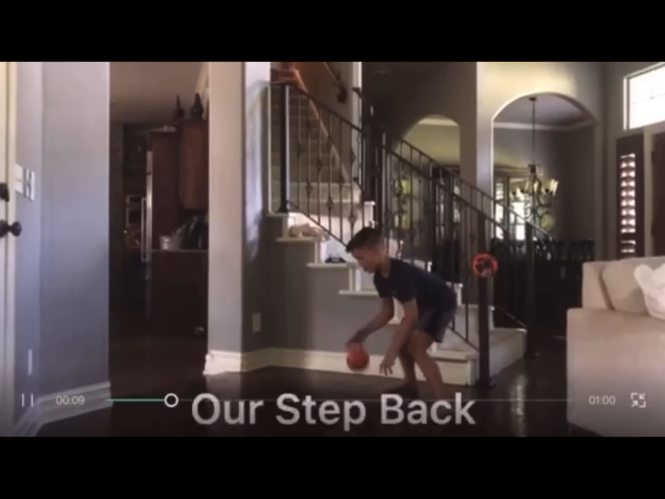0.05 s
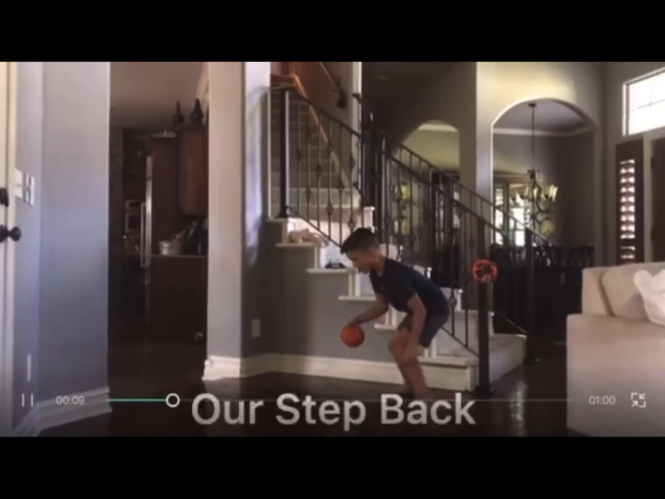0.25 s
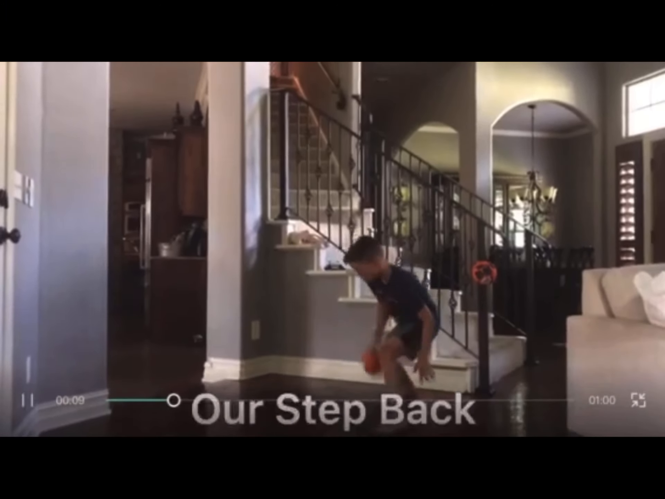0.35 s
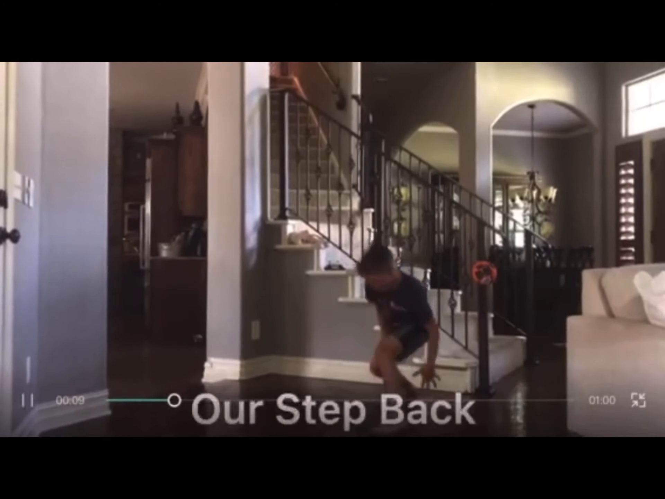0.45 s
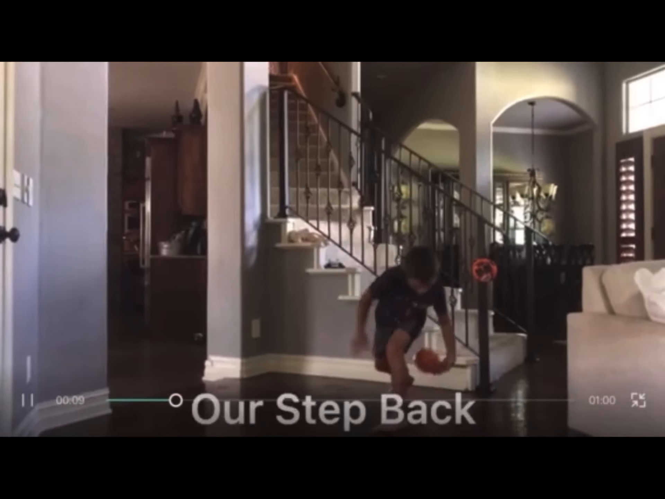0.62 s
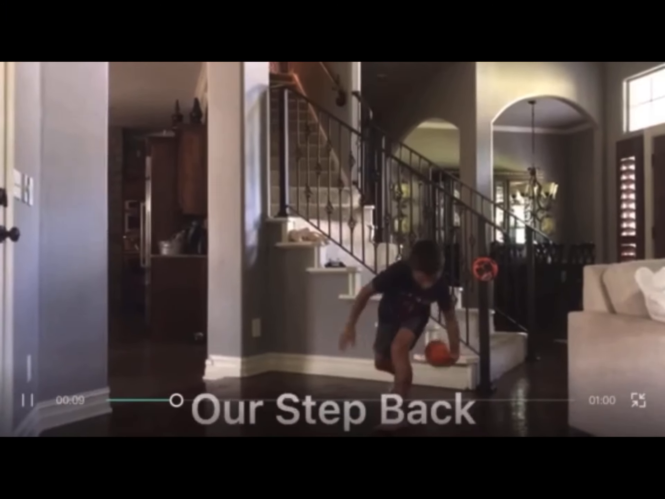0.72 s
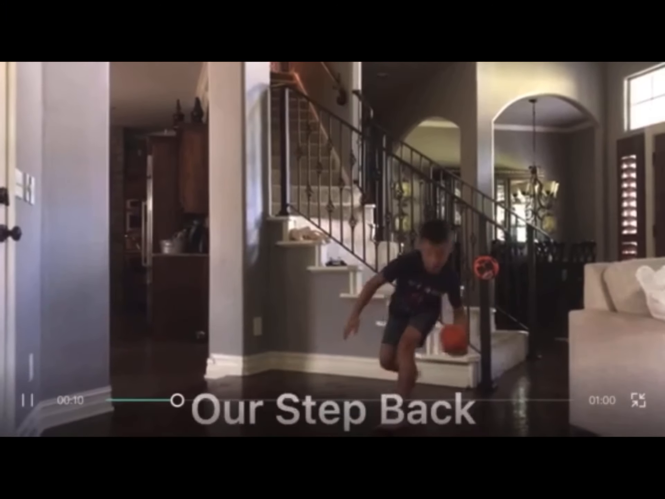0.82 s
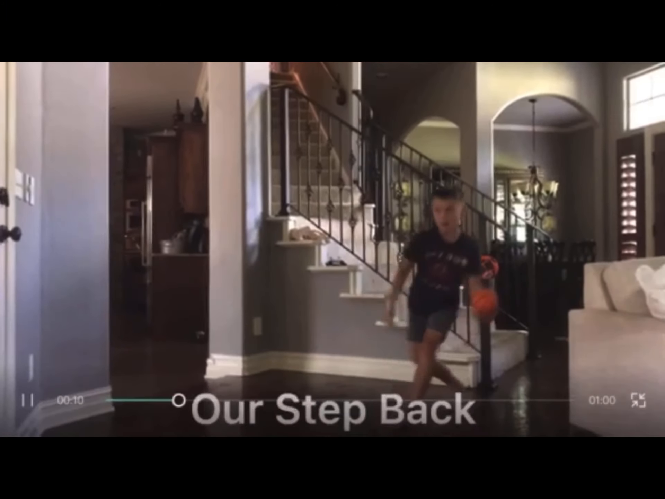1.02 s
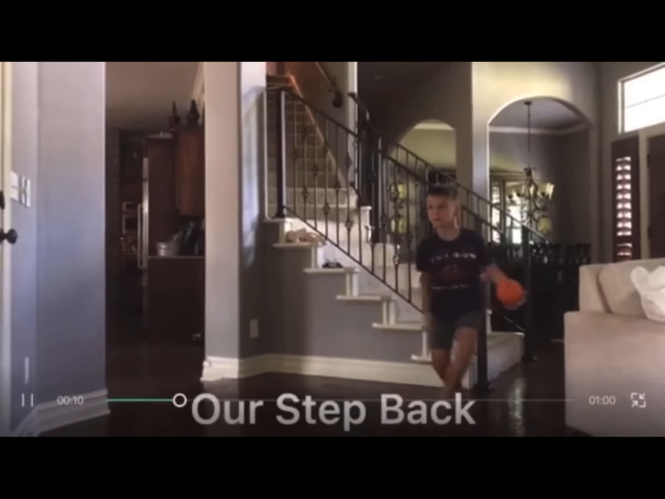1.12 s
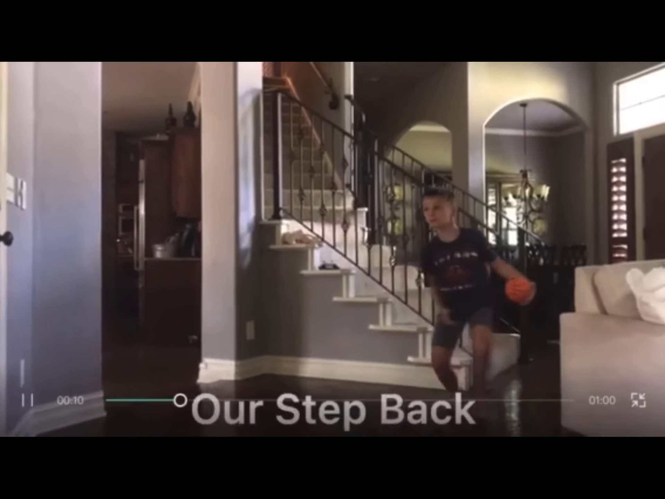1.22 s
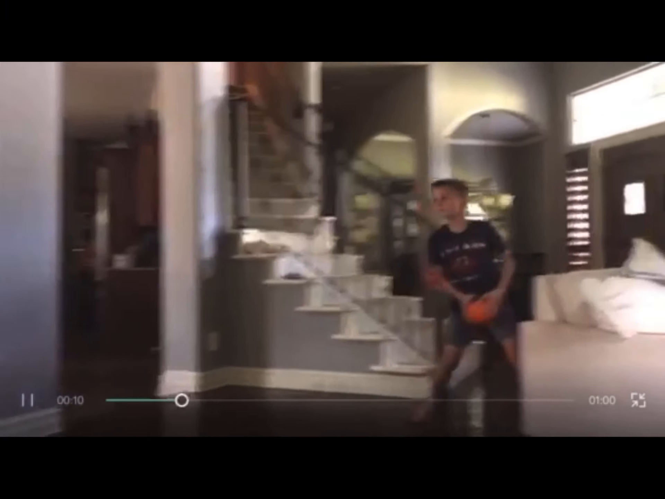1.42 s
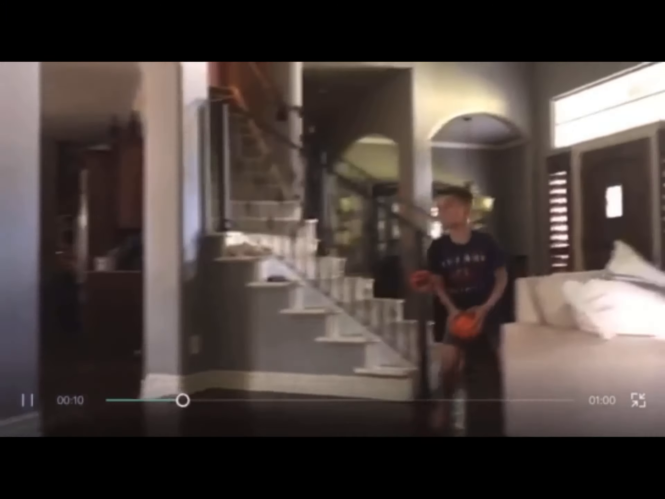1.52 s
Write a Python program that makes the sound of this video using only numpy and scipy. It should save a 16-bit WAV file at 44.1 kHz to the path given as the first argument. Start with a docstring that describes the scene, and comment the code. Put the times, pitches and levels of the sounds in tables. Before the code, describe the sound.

A small rubber ball bounces three times on a hard floor, echoing among shuffling feet.

```python
"""Over the low rumble of a house, a small rubber ball smacks the hard floor of a tall entryway.
The smack's echo swells, holds level for a moment, then dies away.
Feet land and shuffle around a second bounce, and just before one second comes the third and hardest.
As its echo fades, a foot brushes the floor once more."""
import sys
import numpy as np
from scipy import signal
from scipy.fft import rfft, irfft
from scipy.io import wavfile
from scipy.ndimage import uniform_filter1d, minimum_filter1d

SR = 44100
rng = np.random.default_rng(int(sys.argv[2]) if len(sys.argv) > 2 else 0)


def dump(signal):
    """Clip the signal to [-1, 1] and save it as 16-bit WAV at the path in sys.argv[1]."""
    limited = np.clip(np.atleast_2d(signal).T, -1, 1)
    pcm = np.round(limited * 32767).astype(np.int16)
    wavfile.write(sys.argv[1], SR, pcm)


N = 68355
T = np.arange(N) / SR
HZ = np.fft.rfftfreq(2 * N, 1 / SR)

# the ball hitting the floor: t/s, level/dB, hardness/0-1, swell time/s, swell/dB, hold until/s, ring/dB
BOUNCES = [(0.2192, -18.5, 0.0, 0.067, 6.5, .26, 0.5), (0.5955, -17.5, 0.15, 0.058, 7.5, 0.2, -0.5),
           (0.958, -12.5, 1.0, 0.053, 7, .208, -6)]


def amp(db):
    """Turns decibels into a number to multiply by."""
    return 10 ** (np.asarray(db) / 20)


def unit(x):
    """Scales a signal to an average power of one."""
    return x / np.sqrt(np.mean(x ** 2) + 1e-20)


def curve(points):
    """Joins (frequency, value) points into a curve over all frequencies."""
    f, value = np.transpose(points)
    return np.interp(np.log(HZ + 1), np.log(f + 1), value)


def add(mix, s, sound):
    """Mixes a sound in, starting at s seconds."""
    part = mix[max(round(s * SR), 0):][:len(sound)]
    part += sound[:len(part)]


def colour(x, db):
    """Shapes the tone with a curve in dB; white noise would keep its power."""
    cepstrum = irfft(np.log(unit(amp(db)) + 1e-6))
    # folded so that the filter rings only after a hit, never before
    cepstrum[1:N] *= 2
    cepstrum[N + 1:] = 0
    return irfft(rfft(x, 2 * N) * np.exp(rfft(cepstrum)))[:N]


def tone(hz):
    """A pure tone that starts anywhere in its cycle."""
    return np.sin(2 * np.pi * (hz * T + rng.random()))


def reflections(gap=4):
    """Densely packed echoes: one click, randomly up or down, in every few samples."""
    out = np.zeros(N)
    at = np.arange(0, N - gap, gap)
    out[at + rng.integers(0, gap, len(at))] = rng.choice([-1., 1.], len(at))
    return unit(out)


def hold_then_fade(hold_s, bend_s=0.018):
    """Seconds spent before and in the fade since a bounce, with a soft turn between."""
    fading = bend_s * np.logaddexp(0, (T - hold_s) / bend_s)
    return T - fading, fading


def steady_noise(points):
    """Even noise with the given tone colour."""
    return unit(irfft(rfft(rng.standard_normal(2 * N)) * amp(curve(points)))[:N])


def house():
    """The house rumbles steadily, with a low hum and a faint hiss."""
    # tone colours of the rumble and the hiss: f/Hz, relative level/dB
    rumble_colour = [(15, -30), (27, -8), (35, -9), (47, -1.5), (72, -1), (100, -16), (118, -9), (140, -26),
                     (175, -15.5), (215, -27), (400, -35), (800, -62)]
    hiss_colour = [(100, -30), (400, 3.5), (1600, 2.5), (3000, -4.5), (5000, -10), (10000, -16.5),
                   (12000, -22), (15500, -15)]
    # tones of the hum: f/Hz, level/dB
    hum_tones = [(47.3, -40.5), (71, -48.5), (118, -56.5)]
    rumble = amp(-41.5) * steady_noise(rumble_colour)
    hiss = amp(-57) * steady_noise(hiss_colour)
    hum = sum(amp(db) * unit(tone(hz)) for hz, db in hum_tones)
    return rumble + hiss + hum


def shuffles():
    """Soles brush across the floor, each making a swish of noise."""
    # foot slides: peak t/s, rise/s, fall/s, level/dB
    slides = [(0.377, 0.049, .02, -39), (0.48, 0.077, 0.039, -42), (0.715, .015, 0.016, -37.5),
              (0.84, 0.12, 0.076, -43.5), (1.56, 0.041, 0.049, -49.5)]
    # tone colour of a sliding sole: f/Hz, relative level/dB
    slide_colour = [(200, -12), (900, 1), (2000, 7), (4000, 5), (6500, 2), (9000, -3.5), (11500, -24),
                    (12800, -34), (15500, -24)]
    level = np.zeros(N)
    for s, rise, fall, db in slides:
        width = np.where(T < s, rise, fall)
        level += amp(db) * np.exp(-((T - s) / width) ** 2 / 2)
    return colour(level * rng.standard_normal(N), curve(slide_colour))


def feet(pat_s=.005, room_db=-7, room_fade_s=0.98, thud_hz=203.3, thud_fade_s=0.97):
    """Soles pat the floor, heels thud, and both echo softly."""
    # footfalls: t/s, pat level/dB, thud level/dB
    steps = [(0.255, -48, -33.5), (0.467, -32.5, -46), (0.58, -31.5, -46.5), (0.587, -30, -40),
             (0.634, -53, -34.5), (0.86, -38, -39.5), (0.931, -29.5, -65)]
    # tone colour of a landing sole: f/Hz, relative level/dB
    sole_colour = [(100, -9), (560, -0.5), (1200, -1), (2500, -2.5), (4500, -15.5), (8000, -24.5),
                   (11000, -40), (12500, -58)]
    heel_colour = np.maximum(-14 * np.log2((HZ + 1) / thud_hz) ** 2, -80)
    pat_shape = np.exp(-T / pat_s) + amp(room_db - 60 * T / room_fade_s)
    pats, thuds = np.zeros((2, N))
    for s, pat_db, thud_db in steps:
        add(pats, s, amp(pat_db) * reflections() * pat_shape)
        add(thuds, s, reflections() * amp(thud_db - 60 * T / thud_fade_s))
    return colour(pats, curve(sole_colour)) + colour(thuds, heel_colour)


def wall_echoes(burst_s=.004):
    """Flat walls send back short, sharp copies of the latest smack."""
    # returns from single walls: t/s, level/dB
    returns = [(0.2265, -19.5), (0.2715, -18), (0.2976, -16), (0.3035, -18), (0.5973, -25), (0.6172, -23),
               (0.6417, -19), (0.669, -18.5), (0.963, -16), (1.0025, -7), (1.0184, -10.5), (1.025, -11.5),
               (1.0635, -9.5), (1.0985, -22), (1.1358, -15), (1.174, -21), (1.222, -30)]
    bursts = np.zeros((len(BOUNCES), N))
    for s, db in returns:
        latest = sum(bounce[0] < s for bounce in BOUNCES) - 1
        add(bursts[latest], s, amp(db) * reflections() * np.exp(-T / burst_s))
    return sum(colour(x, smack_colour(hardness=bounce[2])) for x, bounce in zip(bursts, BOUNCES))


def smack_echo(swell_s, swell_db, hold_s):
    """The smack's echo swells, holds for a moment and dies away, each band at its own speed."""
    # loudness over time, by band: f/Hz, swell factor, slow drop/(dB/s), time to fade by 60 dB/s, rise/s
    bands = [(147, 0.34, 6, 1.36, 0.02), (536, 0.88, 12, 0.82, 0.0066), (1150, 0.88, 34.5, 0.53, 0.0009),
             (2200, 1.26, 50.5, 0.47, 0.00065), (4360, 0.81, 10.5, 0.35, 0.0043),
             (9000, 0.55, 22, 0.26, .005)]
    spectrum, out = rfft(reflections(), 2 * N), np.zeros(N)
    swell_left = 1 - np.minimum(T / swell_s, 1) ** 2
    accent_db = 2 * np.exp(-(T / 0.02) ** 2)  # the start stands out
    accent_db -= 0.5 * np.exp(-((T / swell_s - 0.3) / 0.17) ** 2)  # the level dips briefly
    accent_db += 0.5 * np.exp(-((T - swell_s) / 0.0083) ** 2)  # top of the swell
    held, fading = hold_then_fade(hold_s)
    past_top = np.maximum(held - swell_s, 0)
    centres = [band[0] for band in bands]
    for weights, (_, factor, drop, fade_s, rise_s) in zip(np.eye(len(bands)), bands):
        band = irfft(spectrum * curve(list(zip(centres, weights))))[:N]
        db = accent_db - factor * swell_db * swell_left - drop * past_top - 60 * fading / fade_s
        out += band * amp(db) * np.minimum(T / rise_s, 1)
    return out


def ringing(swell_s, hold_s, ring_db, fade_s=.55):
    """A few tones swell and linger after a bounce."""
    # lingering tones: f/Hz, relative level/dB, slow drop before the fade/(dB/s)
    tones = [(613.7, -17.5, 6.5), (1002, -18.5, 33), (1152, -15, 25), (1292, -10.5, 33), (1372, -16.5, 31),
             (1484, -17.5, 31), (1598, -13.5, 22), (1794, -10.5, 27), (1820, -14, 8), (2070, -14, 42),
             (2266, -15.5, 26)]
    held, fading = hold_then_fade(hold_s)
    ring = sum(amp(db - drop * held) * tone(hz) for hz, db, drop in tones)
    swell = np.minimum(T / swell_s, 1) ** 2
    return ring * swell * amp(ring_db - 60 * fading / fade_s)


def smack_colour(hardness):
    """Tone curve of a bounce in dB: brighter when harder, with narrow peaks in the midrange."""
    # tone colours of a light and a hard bounce: f/Hz, relative level/dB
    light = [(60, -25), (130, -12.5), (250, -9.5), (370, -13.5), (460, -10), (580, -2), (740, -7.5),
             (1050, -4), (1400, -3.5), (1850, 1), (2700, -7), (3400, -9.5), (4100, -15.5), (4900, -22),
             (6400, -21), (7800, -35.5), (9400, -39), (11500, -61), (13000, -63)]
    hard = [(60, -22), (150, -35), (400, -22.5), (580, -11), (760, -9), (1080, -4.5), (1350, -0.5),
            (1650, 3), (1950, 1), (2330, -7.5), (2700, -7), (2950, -9.5), (3300, -5), (4100, -12.5),
            (4900, -17), (5500, -13.5), (6700, -16), (7700, -24), (9400, -27.5), (11500, -44), (13000, -54)]
    # closely spaced midrange peaks that colour each smack: f/Hz, width/Hz, lift/dB
    peaks = [(994, 37, 5.5), (1166, 39, 7), (1582, 64, 5.5), (1678, 22, 5.5), (1826, 50, 5.5),
             (1898, 71, 6), (2083, 61, 7.5), (2199, 47, 8.5), (2333, 26, 7.5), (2445, 56, 10),
             (2585, 35, 8), (2713, 170, 9), (3073, 85, 7.5), (3257, 47, 2)]
    lifts = [db / (1 + (2 * (HZ - hz) / width) ** 4) for hz, width, db in peaks]
    return (1 - hardness) * curve(light) + hardness * curve(hard) + np.max(lifts, axis=0)


def ball(ripple_db=4, ripple_step_hz=45.5, ripple_full_hz=3500):
    """Each bounce makes an echoing smack and leaves a few tones ringing."""
    # a fine random ripple makes some high frequencies louder and others softer
    ripple = ripple_db * np.interp(HZ / ripple_step_hz, np.arange(N), rng.standard_normal(N))
    ripple *= np.minimum(HZ / ripple_full_hz, 1) ** 4
    out = np.zeros(N)
    for s, db, hardness, swell_s, swell_db, hold_s, ring_db in BOUNCES:
        ring = ringing(swell_s, hold_s, ring_db)
        smack = colour(smack_echo(swell_s, swell_db, hold_s), smack_colour(hardness) + ripple)
        add(out, s, amp(db) * (smack + ring))
    return out


def scene():
    """Ball, feet and house, heard from one spot."""
    return (ball() + wall_echoes() + feet() + shuffles() + house())[None]


def record(dry, ceiling=.96, cutoff_hz=15700):
    """The microphone colours the treble, loud peaks are turned down, and the very top is cut off."""
    # tone colour of the microphone: f/Hz, gain/dB
    mic_colour = [(10000, 0), (11900, 5), (12600, -9), (15500, -8)]
    x = irfft(rfft(dry, 2 * N) * amp(curve(mic_colour)))[:, :N]
    needed_gain = ceiling / np.maximum(abs(x), ceiling)
    smooth_gain = uniform_filter1d(minimum_filter1d(needed_gain, size=65), size=65)
    treble_cut = signal.firwin(511, cutoff_hz, window=("kaiser", 9), fs=SR)
    return signal.oaconvolve(x * smooth_gain, treble_cut[None], "same")


dry = scene()
out = record(dry)
dump(out)
```